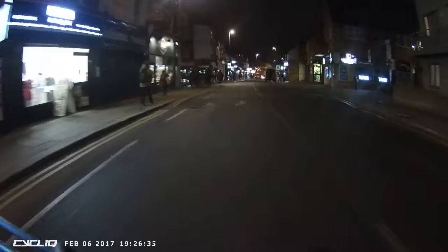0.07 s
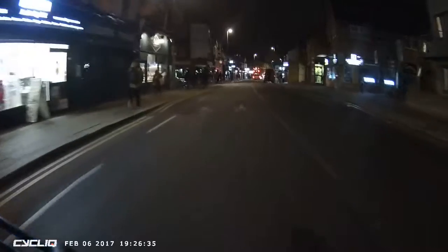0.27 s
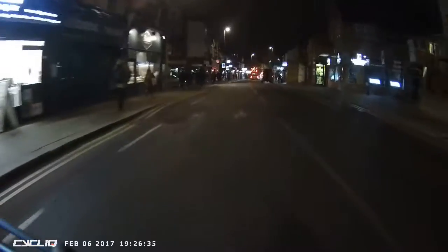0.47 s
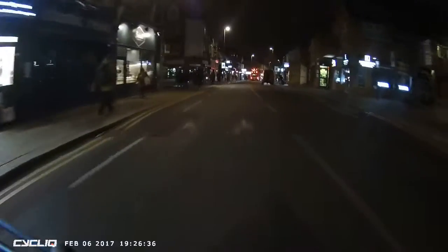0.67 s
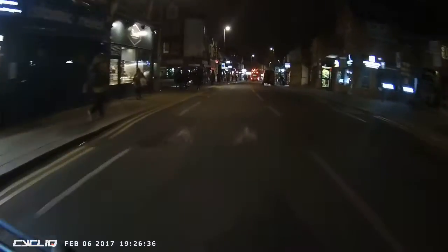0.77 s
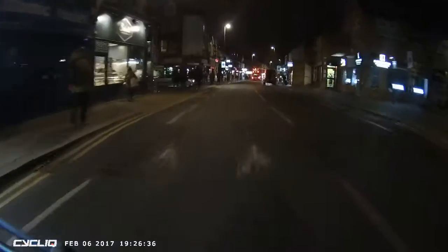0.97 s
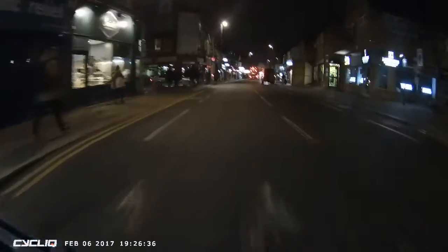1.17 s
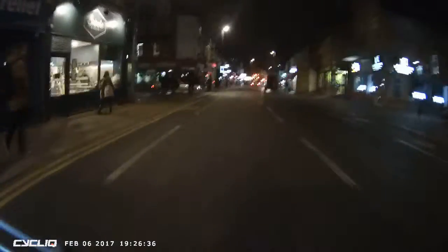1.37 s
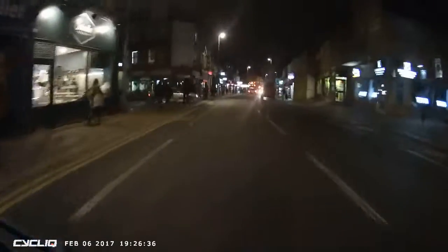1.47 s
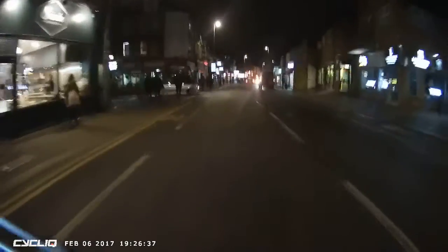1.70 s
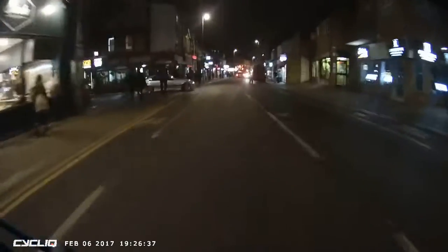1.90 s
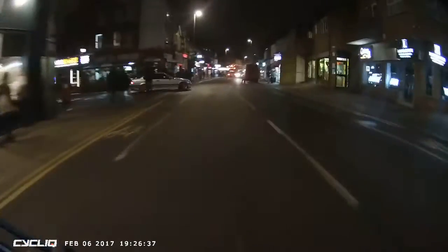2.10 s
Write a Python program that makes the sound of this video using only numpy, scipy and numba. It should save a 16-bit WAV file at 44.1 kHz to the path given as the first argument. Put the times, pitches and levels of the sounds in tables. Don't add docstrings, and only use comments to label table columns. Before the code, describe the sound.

A bicycle bell sounds twice late in a street ride, close to a handlebar microphone. After a brief fade-in at 0.1 s, deep resonant tyre rumble and low wind buffeting run on, with small ticks. Around 1.3-1.4 s a road seam jolts the bar; the mount rattles and knocks until about 1.65 s. A bright ding rings at 1.68 s, then a louder, lower dong at 2.0 s with a clack, over faint hiss.

```python
import sys
import numpy as np
from scipy import signal
from scipy.io import wavfile
from scipy.ndimage import uniform_filter1d
from numba import njit

SR = 44100
rng = np.random.default_rng(int(sys.argv[2]) if len(sys.argv) > 2 else 0)


def to_wav(s):
    ch = np.atleast_2d(s).T
    pcm = np.round(np.clip(ch, -1, 1) * 32767)
    wavfile.write(sys.argv[1], SR, pcm.astype(np.int16))


def how_loud(loudness_db):
    steps = np.asarray(loudness_db, float) / 20
    return 10 ** steps


N = 94594
T = np.arange(N) / SR

# time_s, road_db, wind_db
RIDE = [(.1, -29.5, -30), (0.299, -29.5, -25.5), (.45, -25.5, -29), (0.701, -31.5, -22.5),
        (0.881, -28, -33.5), (1.051, -31, -30.5), (1.201, -28, -27.5), (1.32, -31, -26.5),
        (1.42, -29.5, -32), (1.5, -34.5, -35.5), (1.6, -37.5, -25), (1.7, -33, -28.5), (1.85, -40, -28),
        (2.08, -38.5, -42), (2.14, -36.5, -32.5)]
# pitch_hz, width_hz, level_db
FRAME_MODES = [(83.25, 8.7, 8), (236.2, 53.7, 1.5), (304.3, 40, 3.5), (361, 45, -4.5), (669.6, 161.4, -13),
               (1002, 35, -20.5), (1302, 76, -25.5), (1958, 119, -32), (2220, 140, -43.5), (2914, 220, -41),
               (3830, 300, -69), (4480, 120, -57)]
# pitch_hz, level_db_per_hz
ROAD_SPECTRUM = [(60, -6.5), (150, 1), (420, -43.5), (900, -31.5), (1700, -35.5), (3500, -80), (5500, -73),
                 (12000, -105)]
# start_s, level_db, direction (1 or -1), t60_s
JOLTS = [(0.689, -24.5, 1, 0.23), (0.956, -14, 1, 0.27), (1.276, -13, -1, 0.5), (1.385, -6.5, -1, 0.39),
         (1.397, -6.5, 1, 0.37), (1.504, -18.5, 1, 0.76), (1.726, -16, -1, 0.6), (1.849, -27, 1, 0.38),
         (1.907, -15, 1, 0.17), (2.07, -30, -1, 0.31), (2.123, -20, 1, 0.16)]
# start_s, peak_db, length_s, brightness_db
RATTLES = [(.141, -29.5, 0.0027, -30), (.157, -38, 0.0055, -33), (.293, -36.5, 0.0035, -19),
           (.531, -39.5, 0.0021, -20), (.712, -44.5, 0.0056, -11), (1.256, -41.5, 0.013, -12),
           (1.285, -28.5, 0.0028, -40.5), (1.291, -34, 0.0044, -46), (1.393, -32, 0.0042, -12),
           (1.403, -35.5, 0.0093, -10.5), (1.417, -17, 0.0041, -18.5), (1.4225, -30, 0.0053, -37),
           (1.438, -30.5, 0.0096, -40), (1.4575, -27, 0.0049, -40), (1.4695, -26, 0.0032, -39),
           (1.495, -33, 0.0047, -35), (1.5115, -37, 0.0036, -42), (1.5465, -33, 0.0059, -34),
           (1.561, -77, .003, -40), (1.592, -43, 0.011, -30), (1.608, -38, 0.006, -36),
           (1.6505, -40, 0.0044, -45), (1.751, -29, 0.0025, -36), (1.765, -28.5, 0.003, -21),
           (1.787, -36, 0.011, -40), (1.803, -44, 0.0026, -25), (1.922, -39, 0.0058, -22.5),
           (1.961, -46, .008, -40), (1.988, -27.5, 0.0071, -23), (1.9985, -25, 0.004, -34),
           (.129, -53, .006, -11), (.169, -49, 0.0024, -13), (1.526, -42, .002, -18),
           (1.63, -46, 0.0036, -18), (1.451, -34, 0.0039, -16)]
# pitch_hz, level_db, t60_s
MOUNT_MODES = [(570, 1.5, 0.021), (826, 2, 0.037), (1140, -1.5, 0.024), (1358, -6, 0.0042),
               (1910, -2, 0.029), (2086, -9, 0.011), (3060, -16.5, 0.0087), (4140, -20.5, 0.006),
               (4800, -22, 0.017)]
# start_s, level_db, fade_s
CHATTER = [
    (0.135, -43.5, 0.016),
    (1.279, -41, .02),
    (1.421, -31, 0.033),
    (1.443, -45, 0.021),
    (1.586, -51, 0.057),
    (1.5, -53.5, 0.25),
    (1.682, -38, 0.033),
    (1.745, -42.5, 0.072),
    (2.005, -29.5, 0.024),
]
# start_s, level_db, pitch_hz
CLAMP_KNOCKS = [(.144, -36, 2010), (.147, -37.5, 1830), (.158, -44, 2270), (.172, -50, 2020),
                (1.285, -36, 2150), (1.291, -31.5, 2260), (1.403, -32, 2020), (1.417, -15.5, 2060),
                (1.422, -28, 2120), (1.4375, -26, 2030), (1.4575, -24, 2100), (1.4695, -26.5, 1990),
                (1.4955, -29.5, 2010), (1.512, -26.5, 2030), (1.532, -47, 1990), (1.547, -34, 2020),
                (1.560, -40, 2150), (1.578, -53, 2050), (1.593, -40, 2220), (1.606, -43, 2100),
                (1.615, -34, 2000), (1.628, -49, 2100), (1.651, -33, 2090), (1.694, -46, 2230),
                (1.711, -50, 2050), (1.723, -46, 2100), (1.739, -48, 2200), (1.750, -43, 2000),
                (1.766, -42, 2300), (1.787, -43, 2130), (1.792, -45, 1990), (1.802, -38, 2060),
                (1.829, -43, 2070), (1.841, -55, 2000), (1.873, -44, 2180), (1.924, -39, 2270),
                (1.961, -50, 2000), (1.978, -50, 2190), (1.987, -21.5, 2120), (1.9975, -28, 2210),
                (2.0025, -16, 2030)]
# pitch_hz, level_db
CLAMP_OVERTONES = [(3150, -15.5), (4050, -25), (4950, -26.5)]
# start_s, level_db, pitch_hz, t60_s
HARD_RINGS = [(.129, -58, 5400, 0.015), (1.389, -15, 328, 0.026), (1.4215, -18.5, 1150, 0.013),
              (1.432, -25, 1390, .015), (1.455, -31, 1190, 0.017), (1.512, -32, 900, .015),
              (1.591, -54, 4240, 0.013), (1.662, -58, 6000, 0.013), (1.678, -25.5, 2320, 0.018),
              (1.682, -29, 920, .03), (1.679, -34, 635, 0.022), (1.788, -42, 700, 0.021),
              (1.996, -29, 516, 0.073), (2.0025, -22, 1225, 0.025), (2.003, -24.5, 2930, 0.029),
              (2.006, -25, 1370, 0.026), (2.002, -37, 4690, .04)]
# start_s, clack_db, clack_length_s, brightness_db
BLOWS = [
    (1.6775, -27.5, 0.011, 2),
    (2.0004, -19, 0.012, -15.5),
]
# pitch_hz, level_db, t60_s
BASE_MODES = [(576, 2.5, 0.04), (990, -3, 0.0078), (1360, -1.5, 0.0081), (1920, -2, 0.012),
              (2093, -3.5, 0.047), (2880, 2, 0.039), (4590, -3, 0.005), (7360, -46, .012)]
DING_HZ = [1302, 3294, 5837, 5839, 8792, 10600, 11050, 12098, 15200]
# level_db, t60_s, change_at_second_blow_db
DING = [(-45, 7.6, 0), (-37, 2.54, -6), (-39, 0.37, 0), (-43, 2, -3), (-40, .56, 2), (-48, 0.06, 0),
        (-56, 0.074, 0), (-34.5, 0.18, 0), (-69, .07, 0)]
DONG_HZ = [1044, 2565, 2681, 4567, 4715, 6953, 6960, 9351, 9711, 12020, 12800, 15200]
# level_db, t60_s
DONG = [(-39, 3.1), (-36.5, 0.97), (-46, 0.57), (-40, 0.86), (-34, 0.12), (-45, 0.1), (-53.5, 0.62),
        (-52.5, 0.3), (-78, 0.38), (-43.5, 0.12), (-43, .05), (-58, .04)]
# lead_s, pitch_hz, level_db, t60_s
THUMP = (.009, 515, -24, .09)
# start_s, length_s
OPENINGS = [(.22, 0.036), (0.45, .065), (.70, 0.032), (0.92, 0.095), (1.225, .2), (1.438, 0.072),
            (1.673, .05), (1.98, .06)]


@njit
def svf(x, hz, width):
    y, b, l = np.empty(len(x)), 0., 0.
    g, k = np.tan(np.pi * hz / SR), width / hz
    for i in range(len(x)):
        v = (b + g * (x[i] - l)) / (1 + g * (g + k))
        b, l, y[i] = 2 * v - b, l + 2 * g * v, k * v
    return y


def unit(x):
    return x / np.sqrt(np.mean(x ** 2))


def walk(rate_hz):
    hold = int(SR / rate_hz)
    steps = np.repeat(rng.standard_normal(N // hold + 1), hold)
    return 1.33 * uniform_filter1d(uniform_filter1d(steps, hold), hold)[:N]


def band(hz, width_hz):
    hz, width = 1. * hz, 1.35 * width_hz
    return unit(svf(svf(rng.standard_normal(N), hz, width), hz, width))


def since(start_s):
    return np.clip(T - start_s, 0, None)


def swell(start_s, rise_s=0.0013):
    return 1 - np.exp(-since(start_s) / rise_s)


def ring(start_s, hz, db, t60_s):
    t = since(start_s)
    return how_loud(db - 60 * t / t60_s) * np.sqrt(2) * np.sin(2 * np.pi * hz * t)


def ring_modes(push, modes):
    push = signal.sosfilt(signal.butter(3, 3600, fs=SR, output="sos"), push)
    return sum(how_loud(db + 13.5) * svf(push, 1. * hz, 1.83 / t60) for hz, db, t60 in modes)


def road():
    time_s, road_db, _ = np.array(RIDE).T
    smooth_db = -5 * np.clip((T - 1.29) / 0.033, 0, 1)
    shudder_db = 2.0 * walk(29.78) + walk(80)
    peaks = 0
    for hz, width, db in FRAME_MODES:
        flicker_db = (-1.5 - 2.5 * (hz > 1500)) * walk(17)
        level = how_loud(db + flicker_db + smooth_db * (hz < 340))
        peaks = peaks + level * np.sqrt(width / 70) * band(hz, width)
    spectrum_hz, db_per_hz = np.array(ROAD_SPECTRUM).T
    broad = 0
    for hz in 60 * 2 ** np.arange(0, 8, .5):
        db = np.interp(np.log(hz), np.log(spectrum_hz), db_per_hz)
        level = how_loud(db + 0.8 * walk(16) + smooth_db * (hz < 300))
        broad = broad + level * np.sqrt(hz / 210) * band(hz, hz / 3)
    return how_loud(np.interp(T, time_s, road_db) + shudder_db - 1.0) * (peaks + how_loud(-1) * broad)


def handlebar():
    return sum(np.sign(way) * ring(s, 20., db - 2.5, t60) for s, db, way, t60 in JOLTS)


def knocks(contacts, modes):
    body, tick = np.zeros(N), np.zeros(N)
    grit = np.sign(rng.standard_normal(N))
    for start, db, length, bright_db in contacts:
        t = since(start)
        push = 1.5 * how_loud(db) * swell(start, 0.0009) * np.exp(-t / (length / 2)) * grit
        body += push
        body[int(start * SR) + 8] += 0.72 * how_loud(db)
        tick += how_loud(bright_db) * push * np.exp(-t / 0.0098)
    return ring_modes(body, modes) + svf(svf(tick, 4000.0, 16000.0), 5300.0, 21000.0)


def chatter():
    taps_per_s = 1400
    taps = (rng.random(N) < taps_per_s / SR) * how_loud(1.8 * rng.exponential(size=N)) * rng.standard_normal(N)
    shake = sum(how_loud(db - 1.0) * (T >= s) * np.exp(-since(s) / fade) for s, db, fade in CHATTER)
    burst = np.exp(-np.arange(200) / 48.0) * 0.33 * rng.standard_normal(200)
    return ring_modes(signal.fftconvolve(taps, burst)[:N] * shake, MOUNT_MODES)


def clamp():
    rings = list(HARD_RINGS)
    knock_t60_s = .017
    for start, db, hz in CLAMP_KNOCKS:
        rings.append((start, db, hz, knock_t60_s))
        for overtone_hz, overtone_db in CLAMP_OVERTONES:
            rings.append((start, db + overtone_db, overtone_hz, knock_t60_s))
    return sum(ring(s, hz, db, t60) * swell(s) for s, db, hz, t60 in rings)


def bell():
    first, second = BLOWS[0][0], BLOWS[1][0]
    choke = np.clip((T - second) / 0.01 + .5, 0, 1)
    ding = sum(ring(first, hz, db, t60) * how_loud(choke * change_db)
               for hz, (db, t60, change_db) in zip(DING_HZ, DING))
    dong = sum(ring(second, hz, db, t60) for hz, (db, t60) in zip(DONG_HZ, DONG))
    lead_s, thump_hz, thump_db, thump_t60 = THUMP
    dong = dong + ring(second - lead_s, thump_hz, thump_db, thump_t60)
    return ding * swell(first) + dong * swell(second)


def wind():
    time_s, _, wind_db = np.array(RIDE).T
    return how_loud(np.interp(T, time_s, wind_db) + 2.0 * walk(16) - 2.0) * band(25.4, 25)


def opened():
    return uniform_filter1d(sum(1. * (abs(T - s - d / 2) < d / 2) for s, d in OPENINGS), size=500)


def strip(lo_hz, hi_hz):
    edges = signal.ellip(4, .5, 45, [lo_hz, hi_hz], "bandpass", fs=SR, output="sos")
    return unit(signal.sosfilt(edges, rng.standard_normal(N)))


def hiss():
    edge_hz = 11700
    rung = 1. * (T > BLOWS[0][0] + .03)
    top, strips = opened(), 0
    for hz in range(4800, 12800, 500):
        steady = np.clip((edge_hz - hz) / 1000, -1.5, 3) * (1 - rung) + rung * ((hz - 9500) / 3000)
        gate = np.clip(top + 4 * (walk(44) + steady), 0, 1)
        strips = strips + gate * how_loud(-1 * (hz > 10000)) * strip(hz, hz + 500)
    air = how_loud(-87) * top * band(13700, 2400)
    return how_loud(-6 * rung + 1.5 * walk(60)) * (how_loud(-80.5 - 8.5) * strips + air)


def scene():
    ride = road() + wind() + handlebar()
    mount = knocks(RATTLES, MOUNT_MODES) + chatter()
    struck_bell = knocks(BLOWS, BASE_MODES) + bell()
    return (ride + mount + struck_bell + clamp() + hiss())[None]


def roll_off(x):
    return signal.sosfilt(signal.butter(12, 16440, fs=SR, output="sos"), x)


def record(dry):
    start_s, fade_s = .093, 0.02
    fade = np.clip((T - start_s) / fade_s, 0, 1)
    x = signal.sosfilt(signal.ellip(6, .2, 60, 15000, fs=SR, output="sos"), dry * fade)
    low = signal.sosfiltfilt(signal.ellip(6, .1, 40, 12900, fs=SR, output="sos"), x)
    mix = low + opened() * (x - low)
    return roll_off(mix)


dry = scene()
out = record(dry)
to_wav(out)
```